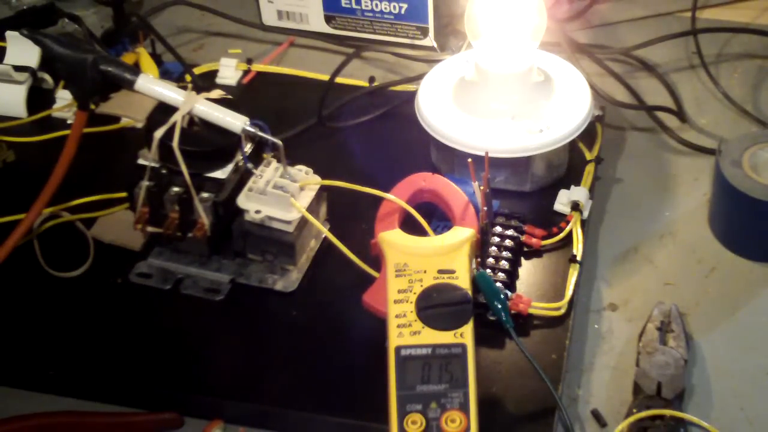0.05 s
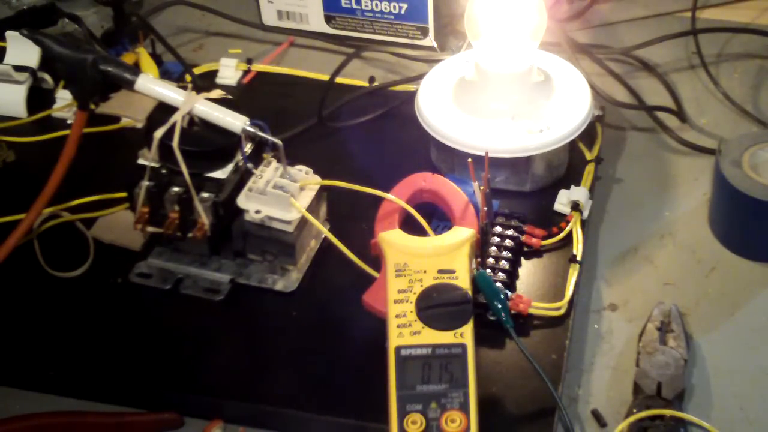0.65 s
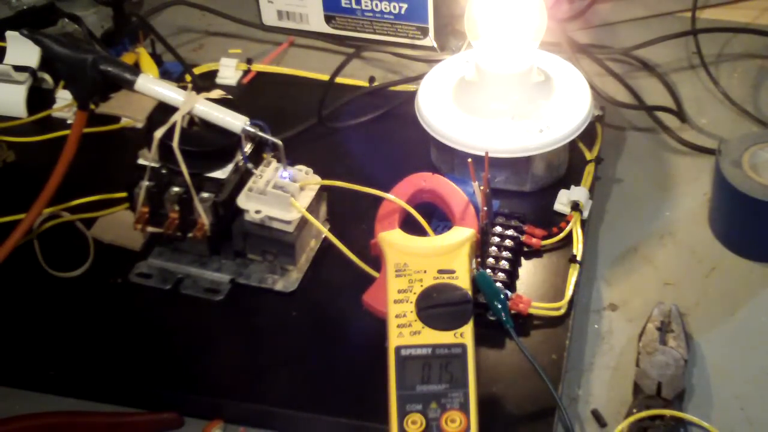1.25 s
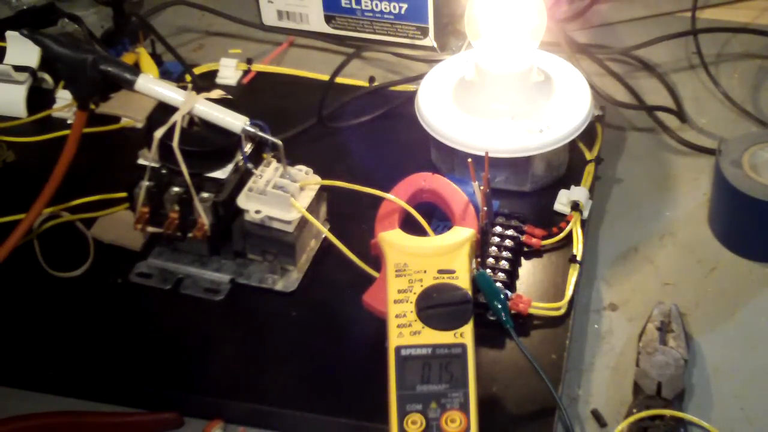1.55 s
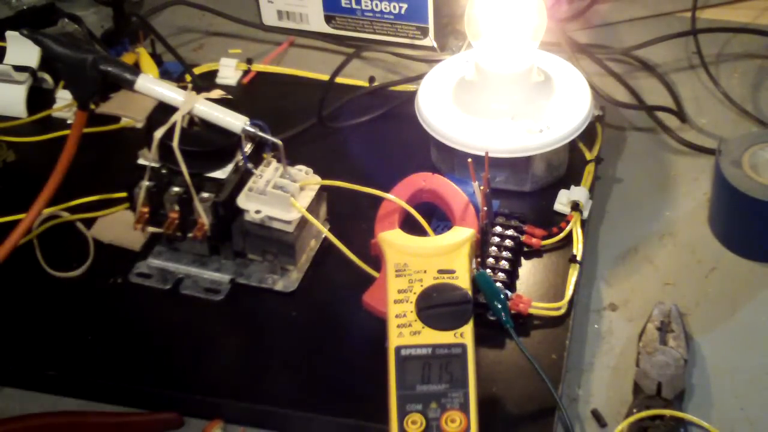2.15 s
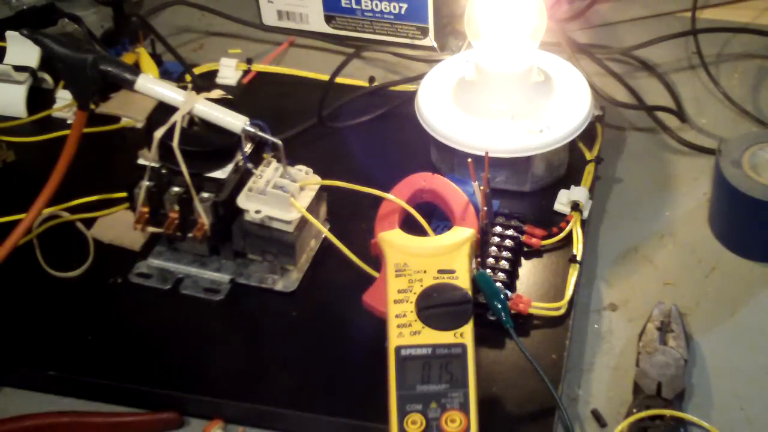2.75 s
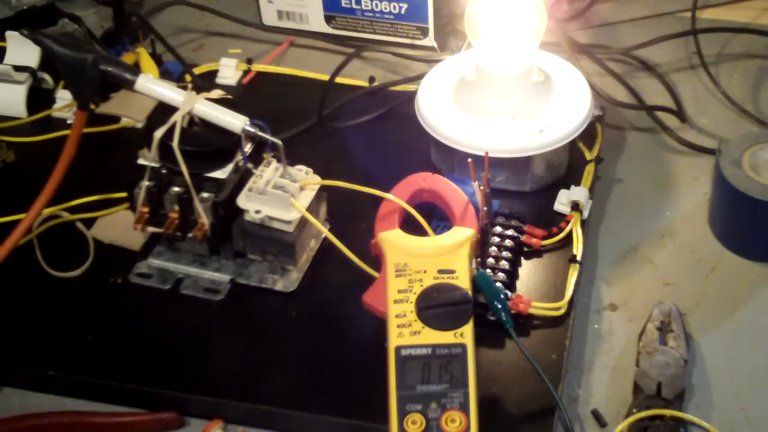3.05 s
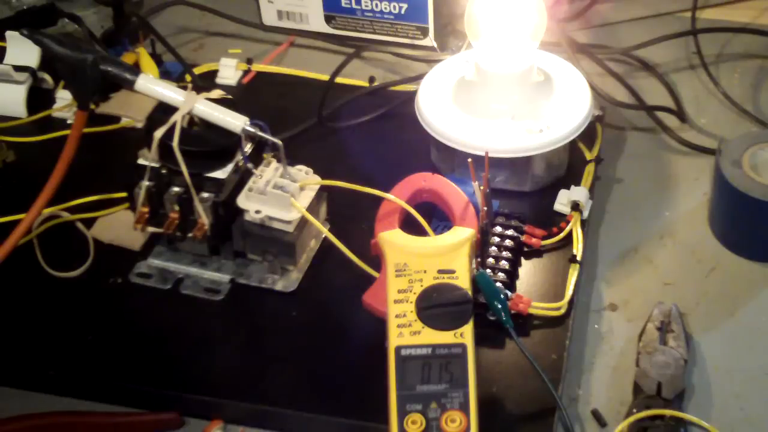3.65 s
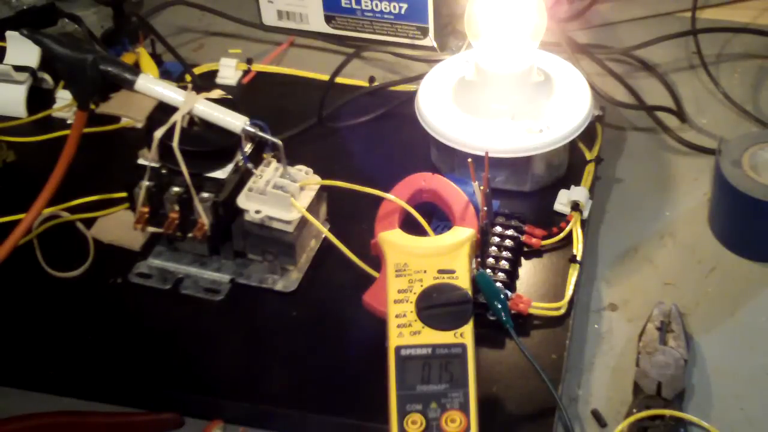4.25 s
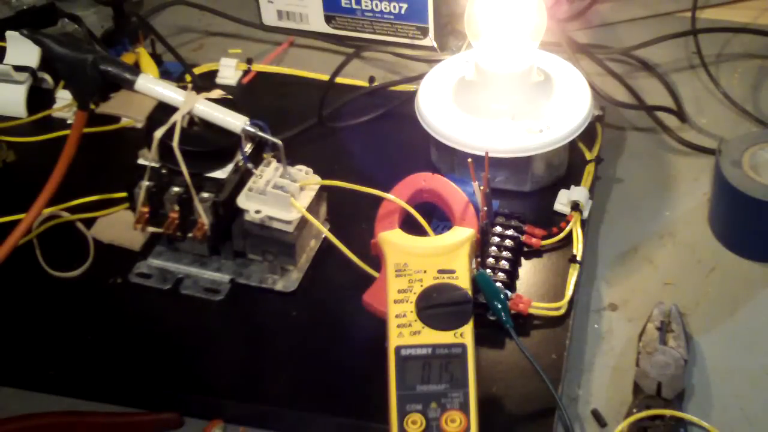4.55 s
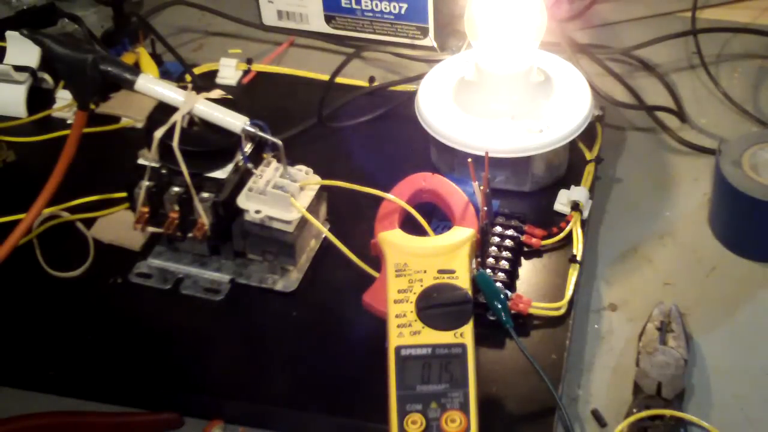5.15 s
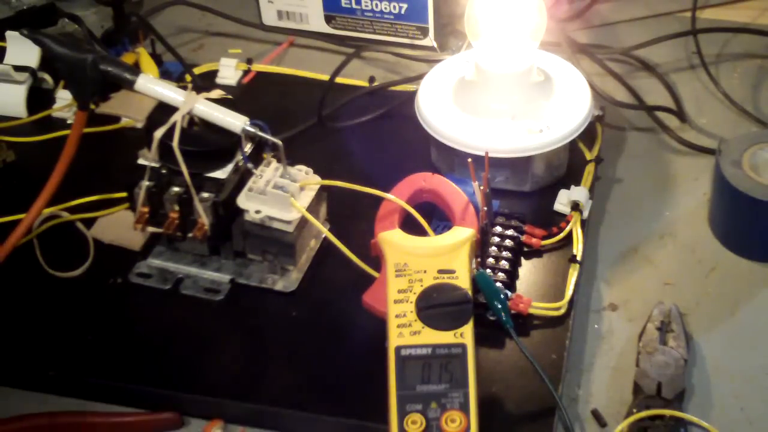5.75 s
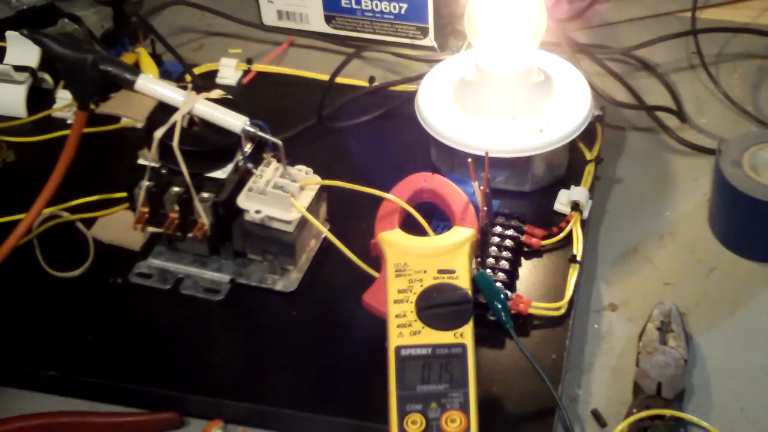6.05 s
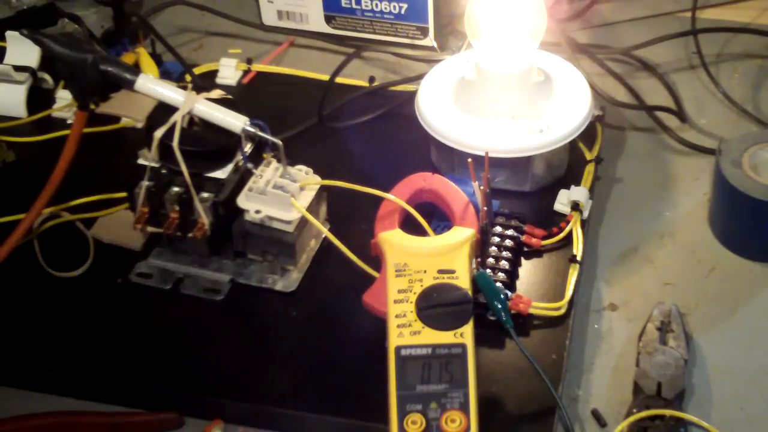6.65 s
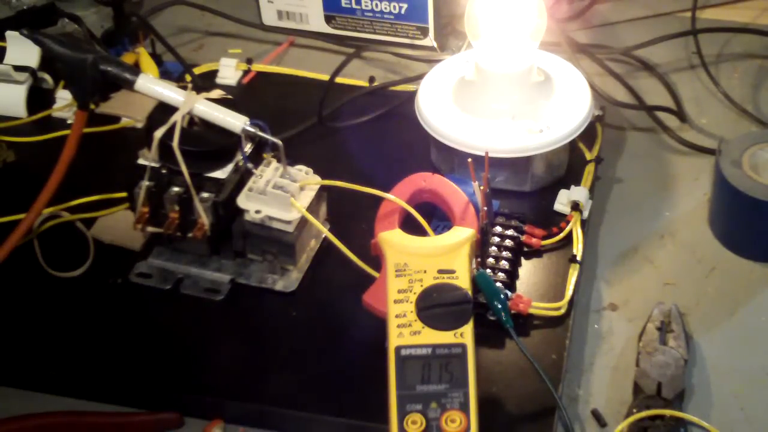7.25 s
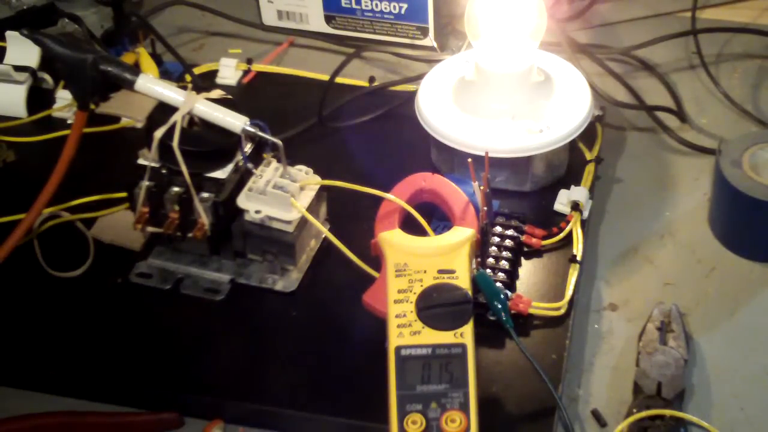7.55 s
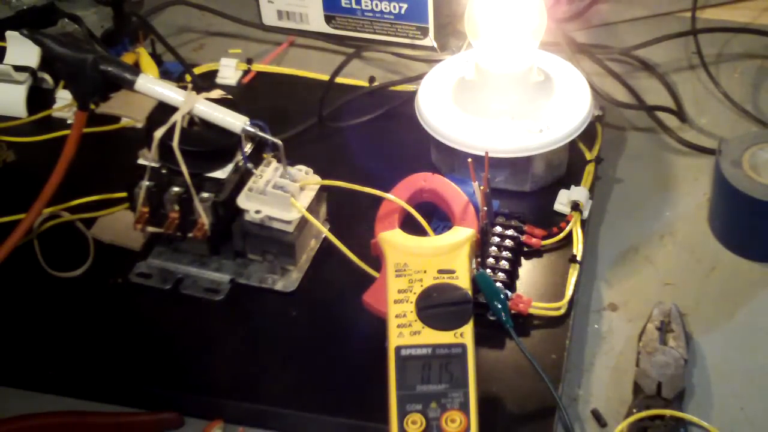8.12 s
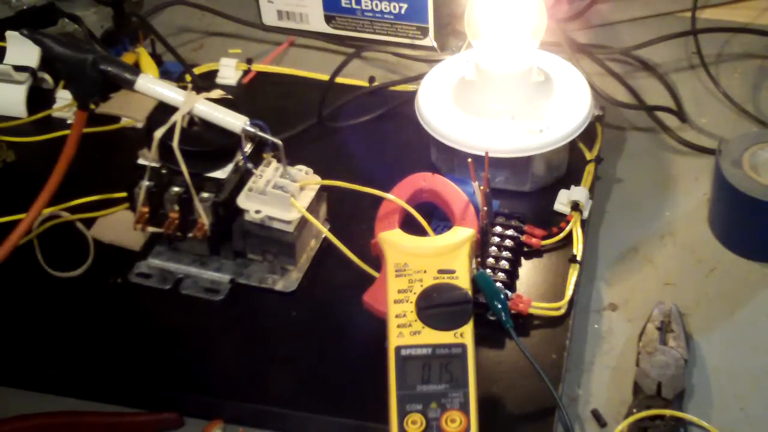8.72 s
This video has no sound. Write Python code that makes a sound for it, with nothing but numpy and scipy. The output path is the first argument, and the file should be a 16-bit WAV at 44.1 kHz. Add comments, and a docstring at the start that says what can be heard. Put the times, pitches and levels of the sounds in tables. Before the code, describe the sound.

Close to a workbench in a small room, a switch snaps on and off three times, a few seconds apart. Each time its contacts arc with a short, bright, buzzing crackle, much louder than the metallic clacks around it. Underneath runs a quiet, steady bed of low electrical hum, thin motor whine and faint electronic sizzle, with one dull low bump between the first two bursts.

```python
"""A transformer hums and a small motor whines over soft room air and a faint electronic sizzle.
Three times a switch clacks, a ragged volley of sparks jumps its contacts for up to a fifth of a second,
and it clacks home. Each blow rings the switch's metal and base; each spark is one sharp crack,
thrown back by the housing, the workbench and the walls.
The microphone is on a hand-held camera, close to the bench in a small room."""
import sys
import numpy as np
from scipy import signal
from scipy.fft import rfft, irfft
from scipy.io import wavfile

SR = 44100
rng = np.random.default_rng(int(sys.argv[2]) if len(sys.argv) > 2 else 0)


def materialize(psi):
    """Save the field psi as 16-bit PCM at rate SR to the path in sys.argv[1].

    A 1-D psi becomes a single channel; in a 2-D psi each row is a channel.
    """
    bounded = np.clip(np.atleast_2d(psi).T, -1, 1)
    quanta = np.round(bounded * 32767).astype(np.int16)
    wavfile.write(sys.argv[1], SR, quanta)


N = 396018


def undb(db):
    """Decibels to gain."""
    return 10 ** (np.asarray(db) / 20)


def unit(x):
    """Scale to rms 1."""
    return x / np.sqrt(np.mean(x ** 2))


def seconds(size):
    """Time axis of size samples."""
    return np.arange(size) / SR


def fade(t, t60):
    """Exponential decay, 60 dB down at t60."""
    return np.exp(-np.log(1000) * t / t60)


def add(track, s, sound):
    """Mix a sound in at time s."""
    i = max(int(round(s * SR)), 0)
    track[i:i + len(sound)] += sound[:N - i]


def gains(points, size):
    """Gain at each Fourier bin from (frequency [Hz], level [dB]) points."""
    hz, db = np.transpose(points)
    return undb(np.interp(np.log(np.fft.rfftfreq(size, 1 / SR) + 1), np.log(hz), db))


def crack(colour, size=512):
    """The shortest causal pulse with this colour, of energy 1."""
    cepstrum = irfft(np.log(gains(colour, size)))
    cepstrum[1:size // 2] *= 2
    cepstrum[size // 2 + 1:] = 0
    pulse = irfft(np.exp(rfft(cepstrum)))
    return pulse / np.linalg.norm(pulse)


def band(x, lo_hz, hi_hz, order=2):
    """Band-pass, scaled to rms 1."""
    return unit(signal.sosfilt(signal.butter(order, [lo_hz, hi_hz], "band", fs=SR, output="sos"), x))


def narrow(hz, width_hz):
    """Noise of rms 1 in one narrow resonance; at 0 Hz it is a slow random drift."""
    f = np.fft.rfftfreq(N, 1 / SR)
    return unit(irfft(rfft(rng.standard_normal(N)) / (1 + (2 * (f - hz) / width_hz) ** 2), N))


def room(x, early_db, early_t60, late_db, late_t60, size=22050):
    """Dense scatter from the clutter on the bench, then the longer tail of the small room."""
    out, t = np.zeros(N), seconds(size)
    for db, t60, onset_s in ((early_db, early_t60, .0008), (late_db, late_t60, .004)):
        tail = rng.standard_normal(size) * fade(t, t60) * (t > onset_s)
        out += undb(db) * signal.fftconvolve(x, tail / np.linalg.norm(tail))[:N]
    return out


def room_tone(air_db=-44.5, sway_db=1.0, waver_db=3.0):
    """Soft air all round the microphone, and low drones that waver in pitch and level."""
    # colour of the room air: (frequency [Hz], relative level [dB])
    air_colour = [(12, 16), (28, 9.5), (75, 10.5), (100, 4.5), (160, 2.5), (250, -1.5), (420, -3.5),
                  (620, 3.5), (950, -7.5), (1550, -7), (2300, -12), (4000, -16), (7200, -22),
                  (15000, -35.5)]
    # drones of the room: (frequency [Hz], pitch waver [Hz], level [dB])
    drones = [(40.2, 0.88, -50.5), (58.3, 0.88, -52), (72.9, 3.1, -45), (148, 2.59, -50.5)]
    air = unit(irfft(rfft(rng.standard_normal(N)) * gains(air_colour, N), N))
    out = air * undb(air_db + sway_db * narrow(0, 3.3))
    for hz, waver_hz, db in drones:
        phase = 2 * np.pi * np.cumsum(hz + waver_hz * narrow(0, 15.4)) / SR
        out += undb(db) * unit(np.sin(phase) * undb(waver_db * narrow(0, 5.3)))
    return out


def handling_thud(size=22050):
    """A nudge reaches the microphone through the camera body as a dull thud."""
    # the nudge: (time [s], frequency [Hz], level [dB], t60 [s])
    nudges = [(2.985, 25.8, -23, 0.3)]
    out, t = np.zeros(N), seconds(size)
    for s, hz, db, t60 in nudges:
        add(out, s, undb(db) * np.sin(2 * np.pi * hz * t) * fade(t, t60))
    return out


def hiss_swell():
    """A faint hiss rises once and dies away."""
    # the swell: (crest [s], half length [s], low edge [Hz], high edge [Hz], level [dB])
    swell = (2.55, .2, 3000, 7000, -57.5)
    crest_s, half_s, lo_hz, hi_hz, db = swell
    envelope = np.exp(-((seconds(N) - crest_s) / half_s) ** 2)
    return undb(db) * band(rng.standard_normal(N), lo_hz, hi_hz) * envelope


def sizzle(burst_db=8, decay_cycles=0.057, flicker_db=1.5):
    """Electronic hiss flares sixty times a second, every other burst slightly weaker."""
    # bands of the hiss: (centre [Hz], width [Hz], level [dB])
    hiss_bands = [(4860, 920, -74.5), (6010, 700, -65), (7850, 630, -69), (9740, 1900, -65),
                  (10920, 640, -68), (11940, 400, -70), (13050, 750, -69), (13950, 700, -72.5),
                  (14987, 70, -71)]
    cycle = 30 * seconds(N)  # two bursts a cycle
    bursts = np.exp(-(cycle % 1) / decay_cycles) + 0.96 * np.exp(-((cycle + .5) % 1) / decay_cycles)
    hiss = sum(undb(db) * narrow(hz, width) for hz, width, db in hiss_bands)
    return hiss * unit(undb(burst_db * bursts + flicker_db * narrow(0, 50)))


def transformer():
    """The core hums at twice the mains rate under faint steady whistles of electronics."""
    # hum and whistles: (frequency [Hz], level [dB])
    tones = [(119.9, -42), (239.8, -65), (1270, -67), (7865, -69.5), (10998, -81), (12048, -83),
             (12166, -79), (14987, -71)]
    t = seconds(N)
    return np.sqrt(2) * sum(undb(db) * np.sin(2 * np.pi * (hz * t + rng.random())) for hz, db in tones)


def motor(wobble_hz=0.0815, flutter_db=0.8, smear_rad=0.95):
    """A small motor nearby creeps up in speed and rasps once a turn; groups of overtones swell and fade."""
    # shaft speed: (time [s], turn rate [Hz])
    shaft_speed = [(0, 113.1), (.6, 113.5), (2.24, 114), (4.5, 114.7), (6.7, 115.38), (8.98, 115.9)]
    # steady tones: (multiple of the turn rate, level [dB])
    steady_orders = [(1, -54), (2, -72), (3, -68), (4, -67), (6, -64), (7, -64), (11, -86.5), (12, -78),
                     (13, -64.5), (14, -70.5), (15, -70.5), (16, -70.5), (19, -70.5), (20, -75),
                     (21, -72.5), (23, -71), (24, -69.5), (25, -72)]
    # swelling tones, by group: (multiple of the turn rate, level before the swell [dB])
    whine_orders = {"drone": [(5, -59)], "low": [(17, -62.5), (18, -62)], "middle": [(22, -59.5),
                    (26, -67.5)], "high": [(27, -75), (28, -62.5), (29, -66.5), (30, -70.5), (31, -75),
                    (32, -70.5), (33, -71.5), (34, -85), (35, -73), (36, -83), (37, -76), (38, -73)]}
    # slow swell, by group: (crest [s], period [s], swing [dB], mean gain [dB])
    swells = {"drone": (7.5, 14, 3.9, 0.78), "low": (1.7, 13.2, 3.8, 0.72), "middle": (1.25, 5.55, 4, -0.9),
              "high": (2.94, 7.5, 2, 0.74)}
    t = seconds(N)
    speed_hz = np.interp(t, *np.transpose(shaft_speed)) + wobble_hz * narrow(0, 11.1)
    angle = 2 * np.pi * np.cumsum(speed_hz) / SR

    def tones(orders):
        """Whole multiples of the turn rate, nearly in step with each other."""
        return np.sqrt(2) * sum(undb(db) * np.sin(k * angle + smear_rad * rng.standard_normal())
                                for k, db in orders)

    out = tones(steady_orders)
    for group, (crest_s, period_s, swing_db, mean_db) in swells.items():
        swell_db = mean_db + swing_db * np.cos(2 * np.pi * (t - crest_s) / period_s)
        out += tones(whine_orders[group]) * undb(swell_db + flutter_db * narrow(0, 14))
    return out


def switch_blows():
    """Every blow as (time [s], metal snap [dB], snap centre [Hz], body knock [dB], fine edge [dB])."""
    # a thin tick between presses: columns as above
    ticks = [(5.748, -62, 4000, -62, -45)]
    # light nudges of the lever: (time [s], gain [dB])
    taps = [(1.116, -2.5), (7.7205, -0.47), (8.032, 0)]
    # presses, a touch and then the full blow: (time [s], gain [dB], touch lead [s], touch gain [dB])
    presses = [(1.1993, 0, 0.00263, -23), (5.0238, -.5, .0063, -2.5), (7.5876, 3, .0029, -6)]
    # one tap and one press: (metal snap [dB], snap centre [Hz], body knock [dB], fine edge [dB])
    tap_blow = (-42, 2250, -35, -58)
    press_blow = (-23.5, 2650, -27.5, -35)
    # the switch springs home: (time [s], snap gain [dB], knock gain [dB], edge gain [dB])
    returns = [(1.4594, 2, -4.3, -2), (5.1851, 0.2, -5, 2), (8.0603, 3.3, -0.1, 3)]
    # it strikes, rebounds and settles: (delay [s], snap [dB], snap centre [Hz], knock [dB], edge [dB])
    return_blows = [(0, -23.5, 3780, -26.5, -25.5), (.0063, -31.5, 2650, -21, -37),
                    (.0215, -36, 2000, -31.5, -52)]

    def struck(s, blow, snap_gain_db, knock_gain_db, edge_gain_db):
        """One kind of blow at a given time and strength."""
        snap_db, snap_hz, knock_db, edge_db = blow
        return s, snap_db + snap_gain_db, snap_hz, knock_db + knock_gain_db, edge_db + edge_gain_db

    out = ticks + [struck(s, tap_blow, db, db, db) for s, db in taps]
    for s, db, lead_s, touch_db in presses:
        out.append(struck(s - lead_s, press_blow, touch_db, touch_db, touch_db))
        out.append(struck(s, press_blow, db, db, db))
    for s, *strength in returns:
        out += [struck(s + delay, blow, *strength) for delay, *blow in return_blows]
    return out


def switch(split_hz=1800, ring_db=-3, scrape_db=-3, snap_spread=1.3, size=13230):
    """Close to the microphone, each blow rings the base low and the metal high while the parts chatter."""
    # modes of the switch and its base: (frequency [Hz], t60 [s], relative level [dB])
    modes = [(472.5, 0.12, -1), (570, 0.1, -7.5), (689, 0.071, 4), (752, 0.12, 0.5), (900, 0.12, -6),
             (1007, .07, -11), (1090, 0.079, -9.5), (1244, 0.064, 0), (1612, 0.055, -2), (2134, 0.012, 7.5),
             (2360, 0.043, -14), (2460, 0.071, 3.5), (2620, 0.035, -4), (2920, 0.035, -0.5),
             (3140, 0.059, -17), (3760, .04, -22), (4250, .07, -5), (4850, .04, -6), (5870, .06, -9)]
    out, t = np.zeros(N), seconds(size)
    for s, snap_db, snap_hz, knock_db, edge_db in switch_blows():
        chance = rng.standard_normal((len(modes), 2))
        knock, snap, edge = rng.standard_normal((3, size))
        blow = undb(knock_db + scrape_db) * band(knock, 505, 1380, order=4) * fade(t, 0.05)
        blow += undb(snap_db) * band(snap, snap_hz / snap_spread, snap_hz * snap_spread) * fade(t, 0.022)
        blow += undb(edge_db) * band(edge, 5800, 13200) * fade(t, 0.042)
        for (hz, t60, db), (detune, polarity) in zip(modes, chance):
            # a blow wakes the metal modes near its own pitch best
            force_db = knock_db if hz < split_hz else snap_db - 8 * abs(np.log2(hz / snap_hz))
            ring = np.sign(polarity) * np.sin(2 * np.pi * hz * (1 + 0.013 * detune) * t)
            blow += undb(force_db + ring_db + db) * ring * fade(t, t60) / 2
        add(out, s, blow * (1 - np.exp(-t / 0.0001)))
    return out + room(out, early_db=-11.5, early_t60=0.11, late_db=-8.5, late_t60=0.32)


def spark_times(mains_hz=60, ripple=.36, breakdown_scatter=.08, stray_spark_s=8.1261):
    """The supply charges the gap, faster and slower with the mains; each full charge jumps as a spark."""
    # volleys: (start [s], length [s], spark rate [Hz] at four even steps from start to end)
    volleys = [(1.2762, .186, 122.1, 147.2, 105, 112.5), (5.0411, 0.14, 154.8, 170.5, 178, 271.3),
               (7.857, .195, 198.7, 180.5, 110, 125.8)]
    times = [stray_spark_s]
    for start, length, *rates_hz in volleys:
        t = start + seconds(int(length * SR))
        rate_hz = np.interp(t, np.linspace(start, start + length, len(rates_hz)), rates_hz)
        charge = np.cumsum(rate_hz * (1 - ripple * np.cos(2 * np.pi * mains_hz * t))) / SR
        breakdowns = 1 + np.arange(64) + breakdown_scatter * rng.standard_normal(64)
        times += [start, *np.interp(breakdowns[breakdowns < charge[-1]], charge, t)]
    return np.sort(times)


def sparks(spark_db=4.0, cold_db=3, leak_db=0.95, jitter_db=1.64, size=1024):
    """Each spark cracks at close range, mirrored by the housing and the bench, scattered by the room."""
    # colour towards the microphone, and into the room: (frequency [Hz], relative level [dB])
    direct_colour = [(300, -28), (1400, -16.5), (2400, -16), (3300, -9), (4200, -13.5), (5300, -2.5),
                     (5900, -9), (7600, -0.5), (8450, -5), (9300, -1.5), (10700, 6.5), (11500, 0.5),
                     (12400, 2.5), (13300, -6.5), (15000, -2.5)]
    shed_colour = [(300, -24), (1300, -12), (2300, -9.5), (3600, -3.5), (5400, -0.5), (8000, 3.5),
                   (10800, 1.5), (12500, 5.5), (14500, -9.5)]
    # echoes off hard faces beside the contacts, and off things on the bench: (delay [s], gain [dB])
    housing_echoes = [(.000261, -5), (.000428, -4.5)]
    bench_echoes = [(.00151, -14.5), (.003285, -10.5), (.00495, -20), (.00825, -22.5), (.00851, -20),
                    (.0096, -12)]
    train, times = np.zeros(N), spark_times()
    # slow sparks are a little weaker than quick ones; only a cold gap holds out longer and cracks louder
    wait_s = np.diff(times, prepend=0)
    wait_db = np.where(wait_s > .5, cold_db, -leak_db * np.log2(np.clip(wait_s, .004, .03) / 0.0042))
    levels_db = spark_db + wait_db + jitter_db * rng.standard_normal(size)[:len(times)]
    for s, db in zip(times, levels_db):
        add(train, s, undb([db]))
    # the close echoes comb the spectrum of each crack
    f = np.fft.rfftfreq(size, 1 / SR)
    comb = 1 + sum(undb(db) * np.exp(-2j * np.pi * f * s) for s, db in housing_echoes + bench_echoes)
    combed_crack = irfft(rfft(crack(direct_colour, size)) * comb)
    close = signal.oaconvolve(train, combed_crack)[:N]
    shed = signal.oaconvolve(train, crack(shed_colour))[:N]
    return close + room(shed, early_db=-11.5, early_t60=0.06, late_db=-11.5, late_t60=0.2)


def scene():
    """The bench and the room at one close microphone."""
    return (switch() + motor() + transformer() + sizzle()
            + room_tone() + handling_thud() + hiss_swell() + sparks())[None]


def record(dry, ceiling=1.8, top_hz=15250):
    """The camera rounds the tips of the sparks and cuts the highest treble."""
    rounded = ceiling * np.tanh(dry / ceiling)
    return signal.sosfilt(signal.ellip(8, .2, 70, top_hz, fs=SR, output="sos"), rounded)


dry = scene()
out = record(dry)
materialize(out)
```